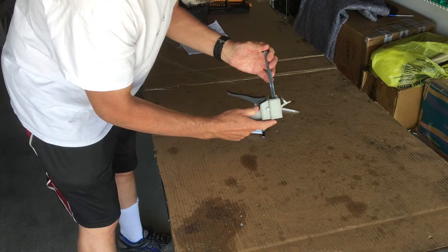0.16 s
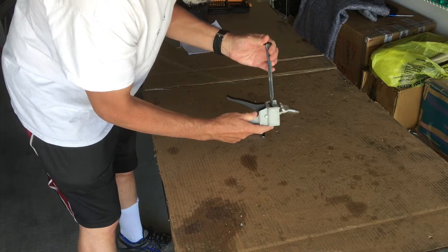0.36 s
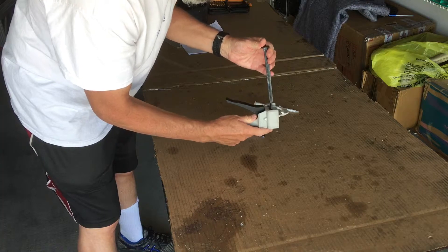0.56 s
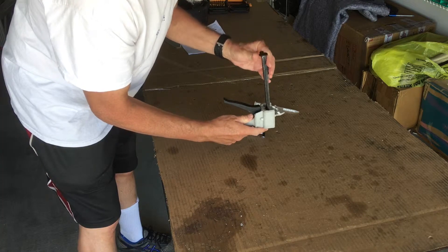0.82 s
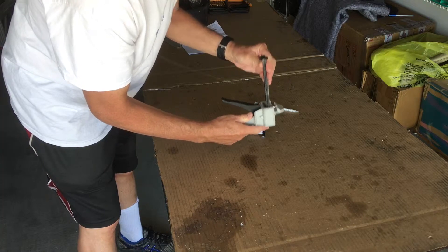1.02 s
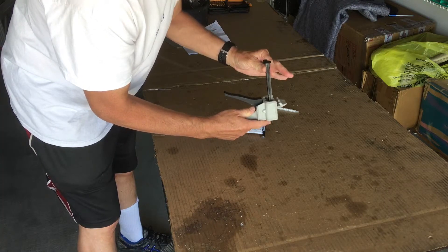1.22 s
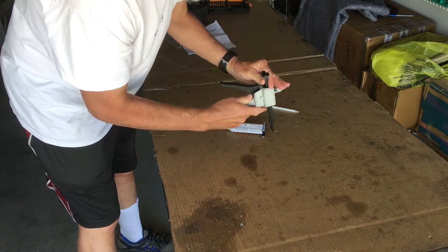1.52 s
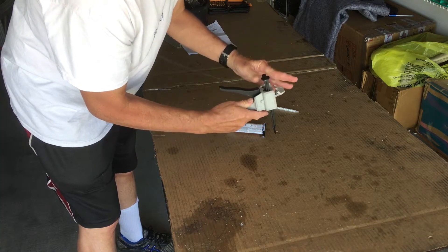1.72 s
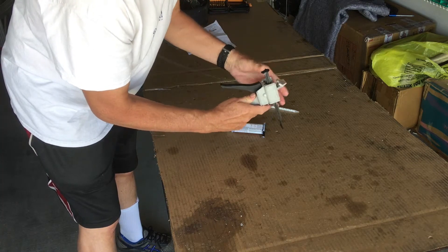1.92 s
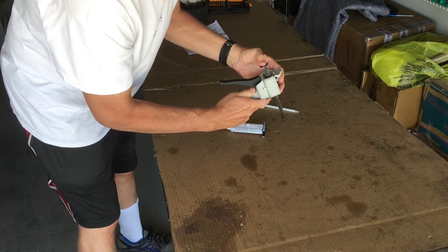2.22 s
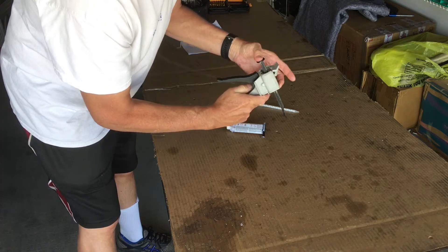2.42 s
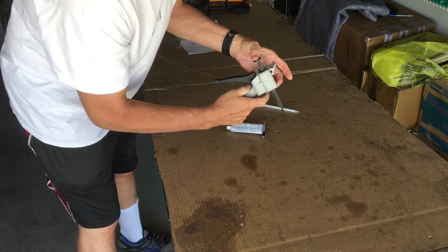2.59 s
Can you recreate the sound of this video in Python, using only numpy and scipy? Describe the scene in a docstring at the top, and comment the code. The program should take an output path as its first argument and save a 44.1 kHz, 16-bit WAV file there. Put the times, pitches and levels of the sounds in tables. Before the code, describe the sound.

A caulking gun's metal rod slides in three short, squeaky scrapes, each ending in ringing clicks from the catch plate, the last two loudest. Then fingers tick lightly on it, close by, over a small workshop's faint hum.

```python
"""Steel cartridge gun over a workbench

The plunger rod scrapes through the frame in three pushes, chattering and squealing as steel sticks
and slips. Each push ends in a clatter of the catch plate that rings the frame; fingers leave faint
ticks. A small workshop answers, over a low rumble, a soft hiss and a faint hum."""
import sys
import numpy as np
from scipy import signal
from scipy.fft import rfft, irfft, next_fast_len
from scipy.io import wavfile
from scipy.ndimage import map_coordinates

SR = 44100
rng = np.random.default_rng(int(sys.argv[2]) if len(sys.argv) > 2 else 0)


def unload_wav(signal):
    """Save mono or channel-first audio to the path in sys.argv[1] as 16-bit WAV at rate SR, clipped to [-1, 1]."""
    wavfile.write(
        sys.argv[1],
        SR,
        np.round(np.clip(np.atleast_2d(signal).T, -1, 1) * 32767).astype(np.int16),
    )


N = 121275

# The catch plate hitting the rod. Each row: start in seconds, level in dB, then knock, presence,
# treble and air EQ in dB, rise in seconds, 60 dB decay in seconds.
PLATE_HITS = [(0.3181, -26.5, -8, 5, -1.5, -14.5, 0.00049, 0.025),
              (0.3695, -37.5, -4, -1, -9, -21, 0.0014, 0.066),
              (0.3791, -32, 7, 7.5, -7, -13.5, .0008, 0.033),
              (.385, -27, 7, 5.5, 1.5, -10.5, 0.00066, 0.02),
              (1.0775, -8, -5, -11, -11.5, -13, 0.00023, 0.019),
              (1.081, -16, -4.5, 0.5, 3.5, 5, 0.0015, 0.025),
              (1.1004, -10, -15, 0.5, 7.5, 2, 0.0017, 0.013),
              (1.5444, -17.5, -1.5, 0.5, 0, 4, .0013, 0.029),
              (1.5536, -9, -7.5, 1.5, -12.5, -11.5, .0011, .023),
              (1.602, -35, -19.5, -4.5, -11.5, -15.5, 0.003, 0.029)]
def catch_plate():
    """The plate snaps against the steel rod in tight clusters of hits, heard in the room."""
    out = np.zeros(N)
    for start, db, knock_db, presence_db, treble_db, air_db, rise_s, t60 in PLATE_HITS:
        hit = steel_hit(rise_s, t60, knock_db, treble_db, presence_db, air_db)
        add(out, start, amp(db) * workshop(hit))
    return out


# Light touches. Each row: start in seconds, level in dB, treble EQ in dB.
FINGER_TICKS = [(0.1347, -53, 3.5), (.1981, -57, 8), (.2145, -38.5, -10), (0.2212, -34, -22.5),
                (0.6178, -56.5, -15), (0.714, -53.5, -2.5), (.755, -53.5, -0.5), (0.8872, -67, 15),
                (.9089, -63.5, 15), (0.9696, -65.5, 8.5), (1.399, -50.5, -5), (1.72, -65, 7),
                (2.186, -60, 5), (2.5114, -63.5, 4), (2.5956, -59, -1.5)]
def finger_ticks():
    """Fingers handling the gun set off tiny, short clicks in the steel."""
    out = np.zeros(N)
    for start, db, treble_db in FINGER_TICKS:
        add(out, start, amp(db) * steel_hit(rise_s=.00053, t60=.016, knock_db=-2, treble_db=treble_db))
    return out


# The colour of a hit's crack. Each row: frequency in Hz, gain in dB.
CRACK_EQ = [(150, -40.5), (400, -23.5), (680, -11.5), (1250, -11), (1650, 3), (2200, 3.5), (3000, 0),
            (3700, 0), (4900, -9), (5600, -3), (6500, -2), (7700, -11.5), (8900, -3), (10500, -10.5),
            (13000, -10.5), (15800, -15)]
# The ringing modes of the frame. Each row: frequency in Hz, level in dB, 60 dB decay in seconds.
FRAME_MODES = [(690, -20, .06), (960, -16, .09), (1736, -1, .16), (1870, -2, .13), (2135, 0, .12),
               (2250, 0, .13), (2440, -4, .14), (2590, -8, .2), (2800, -3, .13), (3415, -4, .11),
               (3690, -3, .12), (4050, -8, .1), (5485, -6, .12), (5525, -7, .12), (6445, -7, .12),
               (8795, -9, .07), (9020, -10, .07)]
def steel_hit(rise_s, t60, knock_db, treble_db, presence_db=0, air_db=None):
    """Steel meets steel: a dense crack, then the ring of the hand-damped frame."""
    t = np.arange(SR // 4) / SR
    envelope = np.minimum(t / rise_s, 1) ** 2 * fade(np.maximum(t - rise_s, 0), t60)
    crack = coloured(rng.choice([-1, 1], len(t)) * envelope, CRACK_EQ)
    hit = amp(1.5) * crack / np.linalg.norm(crack) + amp(-8) * ring(FRAME_MODES)
    hit *= np.linalg.norm(envelope)  # longer hits carry more energy
    return band_eq(hit, knock_db, treble_db, presence_db, air_db)


# The colour of the friction. Each row: frequency in Hz, gain in dB.
FRICTION_EQ = [(300, -33), (1000, -23.5), (1400, -13.5), (1700, -2), (2300, -4), (3400, 1.5), (4800, -2),
               (6300, -1.5), (7500, -8), (8300, -3.5), (9600, -7), (10500, -12), (13500, -9),
               (15800, -19.5)]
# Pushes and light rubs. Each row: start, end and rise in seconds, level at start and at end in dB,
# treble EQ at start and at end in dB.
ROD_STROKES = [(0.135, 0.155, 0.0037, -54, -50.5, -12, -14), (0.221, 0.309, 0.014, -39.5, -43, -5, -0.5),
               (0.733, 0.752, 0.012, -57.5, -56, -6, 0), (0.76, 0.797, 0.0077, -66, -70.5, -4, 5),
               (1.038, 1.086, 0.025, -47, -35, 0.5, 7), (1.083, 1.093, 0.0022, -31, -31, 0.5, 5),
               (1.421, 1.451, 0.0048, -59.5, -58.5, -2, -1), (1.456, 1.549, 0.017, -44.5, -33, -10, 12),
               (2.009, 2.046, .02, -75, -72, 6, 8.5), (2.211, 2.295, 0.019, -71.5, -67.5, -2.5, 0.5),
               (2.594, 2.628, 0.0087, -57.5, -62, -4, -4.5), (2.66, 2.711, 0.018, -69, -69.5, 6, 3.5)]
def rod_scrape():
    """The sliding rod hisses with friction and rings the frame; each stroke has its own brightness."""
    grains = slips()
    hiss = unit_rms(coloured(grains, FRICTION_EQ))
    frame = amp(-8.5) * signal.fftconvolve(grains, ring(FRAME_MODES))[:N]
    friction = band_eq(hiss + frame, knock_db=-8, treble_db=.5)
    scrape = amp(-3) * (friction + amp(-1) * rasp())
    body = lowpass(scrape, TREBLE_HZ)
    treble = scrape - body
    out = np.zeros(N)
    for start, end, rise_s, start_db, end_db, start_treble_db, end_treble_db in ROD_STROKES:
        out += body * stroke(start, end, rise_s, start_db, end_db)
        out += treble * stroke(start, end, rise_s, start_db + start_treble_db, end_db + end_treble_db)
    return out


def rasp(squeaks_per_s=420, length_s=.014, low_hz=1701, high_hz=10050):
    """Rough spots on the rod each squeak briefly at a pitch of their own."""
    out = np.zeros(N)
    progress = np.linspace(0, 1, int(length_s * SR))
    for when, pitch, size in rng.random((int(squeaks_per_s * N / SR), 3)):
        hz = low_hz * (high_hz / low_hz) ** pitch
        squeak = np.sin(np.pi * progress) * np.sin(2 * np.pi * hz * length_s * progress)
        add(out, when * (N - 1) / SR, size * squeak)
    return unit_rms(out)


# Bursts of chatter. Each row: start and end in seconds, level at start and at end in dB.
CHATTER_BURSTS = [(0.123, 0.158, -60, -59), (0.214, 0.228, -35.5, -58), (1.388, 1.478, -53.5, -52),
                  (1.456, 1.532, -40.5, -47.5)]
# The ringing modes of the rod. Each row: frequency in Hz, level in dB, 60 dB decay in seconds.
ROD_MODES = [(1605, -6, .08), (1730, -4, .08), (1880, -2, .07), (2003, 0, .11), (2150, -6, .06),
             (2942, -14, .12), (3440, -7, .06)]
def rod_chatter(rise_s=.0065):
    """As the rod starts to slip, a stream of tiny jolts makes it ring."""
    force = sum(stroke(start, end, rise_s, start_db, end_db)
                for start, end, start_db, end_db in CHATTER_BURSTS)
    chatter = signal.fftconvolve(slips() * force, ring(ROD_MODES))[:N]
    return band_eq(chatter, knock_db=-21.5, treble_db=-1.5)


# Brief squeals. Each row: start and length in seconds, pitch at start and at end in Hz, level in dB.
STEEL_SQUEALS = [(.224, .016, 4100, 4000, -49), (.226, .02, 9700, 9800, -52), (.25, .02, 8900, 9150, -47),
                 (.275, .03, 5400, 5500, -51), (.277, .02, 7100, 6950, -50), (.535, .05, 4750, 4400, -72),
                 (.614, .016, 2060, 2030, -60), (.742, .022, 5600, 5580, -62), (.9, .018, 6450, 6420, -64),
                 (1.044, .016, 5550, 5480, -46), (1.046, .016, 6900, 6800, -46),
                 (1.048, .016, 4450, 4380, -39), (1.064, .014, 9200, 9100, -39),
                 (1.42, .032, 2010, 1995, -46), (1.46, .026, 2020, 1980, -36),
                 (1.48, .014, 4250, 4100, -44), (1.485, .018, 1990, 1930, -40),
                 (1.492, .022, 8000, 8050, -39), (1.497, .045, 1700, 1580, -42),
                 (1.555, .015, 3550, 3450, -27), (1.598, .022, 2560, 2540, -37),
                 (2.268, .028, 2900, 3000, -60)]
def squeals(pitch_wander=.018):
    """Stick-slip of steel on steel locks briefly onto one unsteady pitch."""
    out = np.zeros(N)
    for start, length_s, start_hz, end_hz, db in STEEL_SQUEALS:
        progress = np.linspace(0, 1, int(length_s * SR))
        glide_hz = start_hz + (end_hz - start_hz) * progress
        hz = glide_hz * (1 + pitch_wander * wobble(knots_per_s=600)[:len(progress)])
        envelope = amp(db) * np.sin(np.pi * progress)
        add(out, start, envelope * np.sin(2 * np.pi * np.cumsum(hz) / SR))
    return workshop(out)


# The length of the room's tail. Each row: frequency in Hz, 60 dB decay in seconds.
TAIL_DECAY = [(400, .19), (2500, .2), (6000, .19), (10000, .175), (15000, .15)]
# The colour of that tail. Each row: frequency in Hz, gain in dB.
TAIL_EQ = [(400, 1.5), (1200, -4.5), (2200, -7.5), (6000, -2.5), (10000, -7.5), (15000, -2.5)]
def workshop(direct, bench_delay_s=.0043, bench_db=-13, tail_delay_s=.006, tail_db=-5.5):
    """The direct sound, its bounce off the bench and the short diffuse tail of a small room."""
    hz, t, noise = signal.stft(rng.standard_normal(SR // 2), SR, nperseg=256)
    decay = fade(t, along(TAIL_DECAY, hz)[:, None])
    _, tail = signal.istft(noise * decay, SR, nperseg=256)
    tail = coloured(tail / np.linalg.norm(tail), TAIL_EQ)
    out = np.zeros(N)
    add(out, 0, direct)
    add(out, bench_delay_s, amp(bench_db) * direct)
    add(out, tail_delay_s, amp(tail_db) * signal.fftconvolve(direct, tail))
    return out


# The colour of the noise bed. Each row: frequency in Hz, gain in dB.
BED_EQ = [(20, -6), (42, 0), (60, -7), (100, -14.5), (150, -18.5), (290, -26.5), (420, -35), (820, -33.5),
          (2000, -36.5), (2800, -37.5), (3400, -40.5), (8000, -41.5), (12500, -39), (15800, -42.5)]
# The tones of the hum. Each row: frequency in Hz, RMS level in dB.
HUM_TONES = [(41, -65.5), (122, -69), (239, -78), (355, -79.5), (829, -81.5)]
def room_tone(bed_db=-55.5, rumble_hz=70, swing_db=4):
    """A low rumble swells and sinks under an even hiss and a faint wavering hum."""
    t = np.arange(N) / SR
    bed = unit_rms(coloured(rng.standard_normal(N), BED_EQ))
    rumble = lowpass(bed, rumble_hz)
    hiss = bed - rumble
    swell = amp(swing_db * wobble(knots_per_s=5.1))
    hum = sum(amp(db) * np.sqrt(2) * np.sin(2 * np.pi * hz * t + .66 * wobble(knots_per_s=4.4))
              for hz, db in HUM_TONES)
    return amp(bed_db) * (hiss + rumble * swell) + hum


def ring(modes, attack_s=.0005):
    """Struck steel rings in decaying modes, a little different each time; total energy is 1."""
    t = np.arange(SR // 4) / SR
    x = sum(amp(db + rng.normal(0, 1)) * fade(t, t60) * np.sin(2 * np.pi * (hz * t + rng.random()))
            for hz, db, t60 in modes)
    x *= np.minimum(t / attack_s, 1)
    return x / np.linalg.norm(x)


def slips(grains_per_s=4500, spread_db=3.8):
    """The grain of friction: tiny stick-slip impulses at random times."""
    slipping = rng.random(N) < grains_per_s / SR
    size = amp(spread_db * rng.standard_normal(N))
    return unit_rms(slipping * size * rng.choice([-1, 1], N))


def stroke(start, end, rise_s, start_db, end_db, release_s=.008):
    """The envelope of one push: a rise, a steady change of force, a quick release."""
    t = np.arange(N) / SR
    gate = np.clip((t - start) / rise_s, 0, 1) * np.clip(1 - (t - end) / release_s, 0, 1)
    return gate * amp(np.interp(t, [start, end], [start_db, end_db]))


KNOCK_HZ, PRESENCE_HZ, TREBLE_HZ, AIR_HZ = 1100, 2700, 4600, 9300
def band_eq(x, knock_db, treble_db, presence_db=0, air_db=None):
    """Knock lies below its edge, the other bands above theirs; air follows treble unless set."""
    def gain_db(hz):
        def above(edge_hz):
            return 1 - 1 / (1 + (hz / edge_hz) ** 8)
        knock = knock_db * (1 - above(KNOCK_HZ))
        presence = presence_db * above(PRESENCE_HZ)
        treble = (treble_db - presence_db) * above(TREBLE_HZ)
        air = 0 if air_db is None else (air_db - treble_db) * above(AIR_HZ)
        return knock + presence + treble + air
    return minimum_phase(x, gain_db)


def coloured(x, eq_points):
    """Shape x with an EQ curve drawn through (Hz, dB) points."""
    return minimum_phase(x, lambda hz: along(eq_points, hz))


def minimum_phase(x, gain_db):
    """Filter x by the curve gain_db(hz), with no ringing ahead of an attack."""
    size = 2 * next_fast_len(len(x) // 2 + 4096)
    gain = amp(gain_db(np.fft.rfftfreq(size, 1 / SR)))
    cepstrum = irfft(np.log(np.maximum(gain, 1e-6)), size)
    cepstrum[1:size // 2] *= 2
    cepstrum[size // 2 + 1:] = 0
    return irfft(rfft(x, size) * np.exp(rfft(cepstrum)), size)[:len(x)]


def lowpass(x, hz):
    """The lows of x, with no phase shift."""
    return signal.sosfiltfilt(signal.butter(2, hz, fs=SR, output="sos"), x)


def along(points, hz):
    """Read between (Hz, value) points on a log frequency axis."""
    point_hz, values = np.transpose(points)
    return np.interp(np.log(hz + 1), np.log(point_hz + 1), values)


def wobble(knots_per_s):
    """A smooth random curve."""
    knots = rng.standard_normal(int(N * knots_per_s / SR) + 4)
    return map_coordinates(knots, [np.arange(N) * knots_per_s / SR], mode="nearest")


def fade(t, t60):
    """Gain that falls 60 dB in t60 seconds."""
    return amp(-60 * t / t60)


def amp(db):
    return 10 ** (np.asarray(db) / 20)


def unit_rms(x):
    return x / np.sqrt(np.mean(x ** 2) + 1e-20)


def add(track, start_s, x):
    """Mix x into the track at start_s."""
    i = int(round(start_s * SR))
    track[i:i + len(x)] += x[:N - i]


def scene():
    """The mono mix: the gun in the workshop, over the room tone."""
    clicks = catch_plate() + workshop(finger_ticks())
    rod = workshop(rod_scrape() + rod_chatter())
    return (clicks + rod + squeals() + room_tone())[None]


def record(dry, ceiling=.9, top_hz=15830):
    """Clip any peak over the ceiling, then cut the very top of the treble."""
    size = next_fast_len(N + SR // 2)
    spectrum = rfft(np.clip(dry, -ceiling, ceiling), size)
    passband = np.fft.rfftfreq(size, 1 / SR) < top_hz
    return irfft(spectrum * passband, size)[..., :N]


dry = scene()
out = record(dry)
unload_wav(out)
```